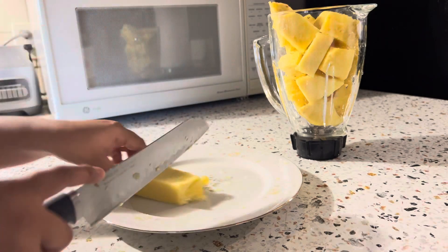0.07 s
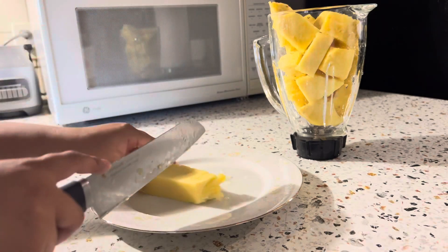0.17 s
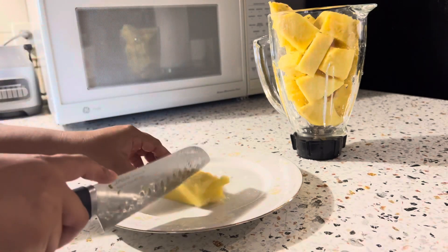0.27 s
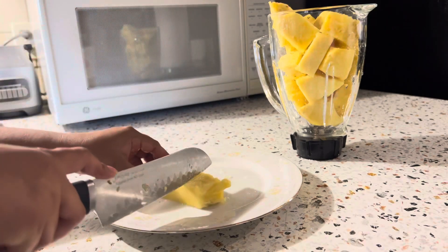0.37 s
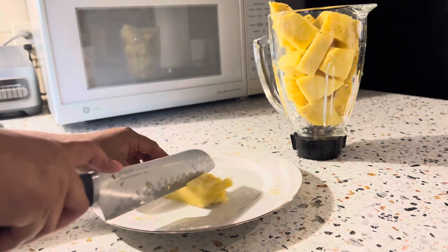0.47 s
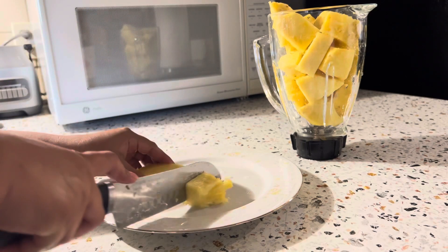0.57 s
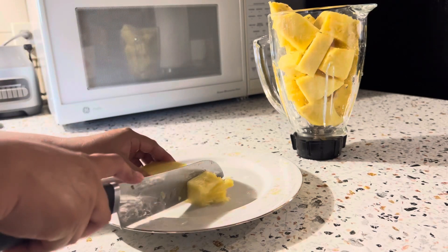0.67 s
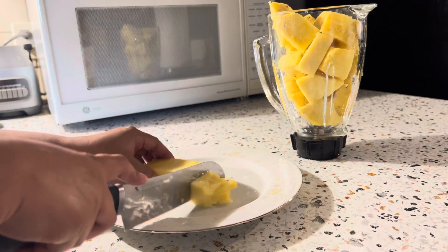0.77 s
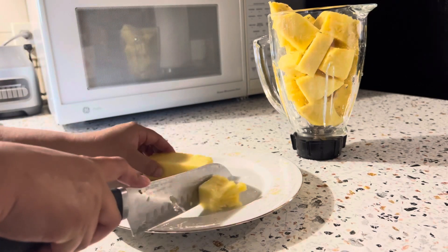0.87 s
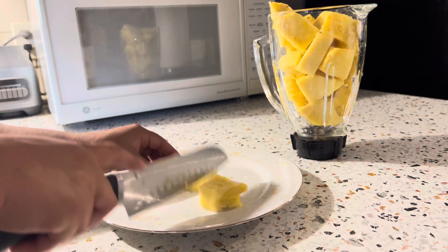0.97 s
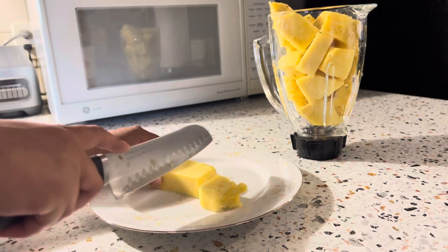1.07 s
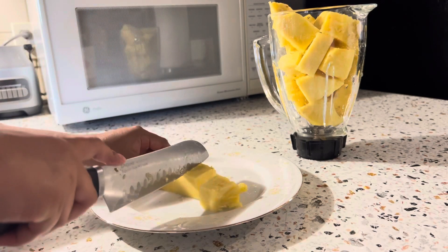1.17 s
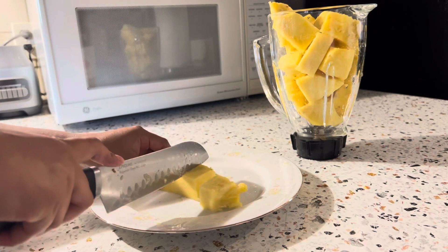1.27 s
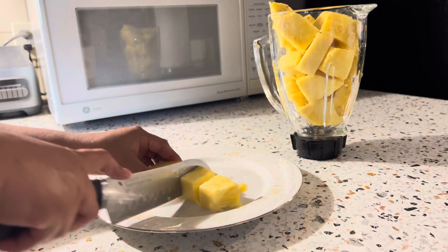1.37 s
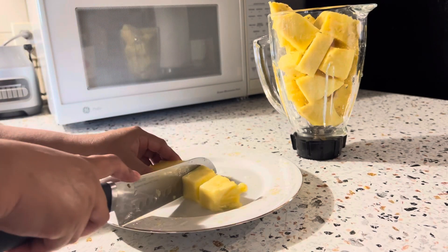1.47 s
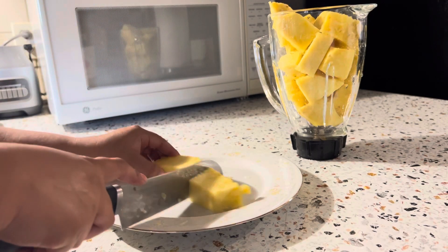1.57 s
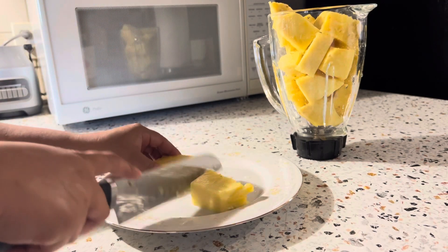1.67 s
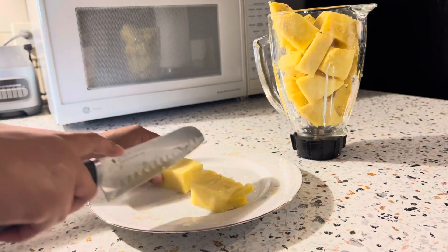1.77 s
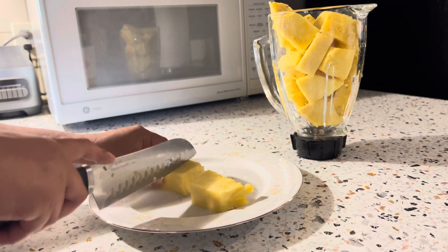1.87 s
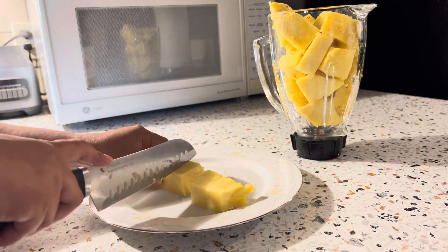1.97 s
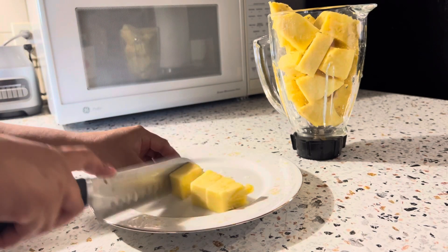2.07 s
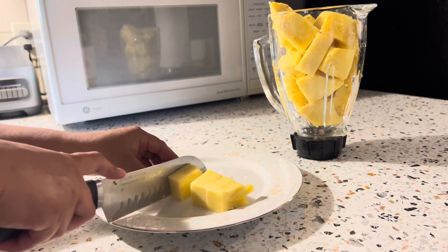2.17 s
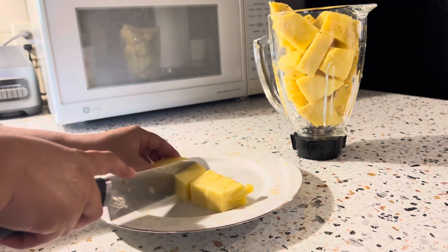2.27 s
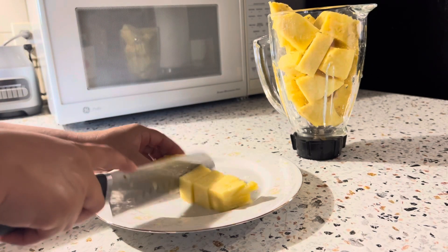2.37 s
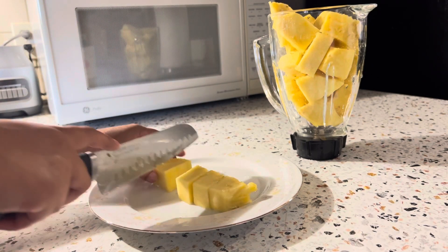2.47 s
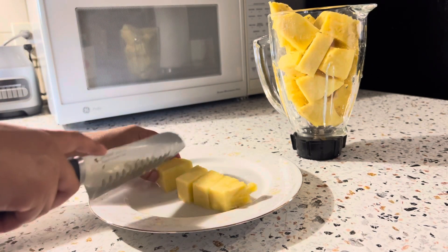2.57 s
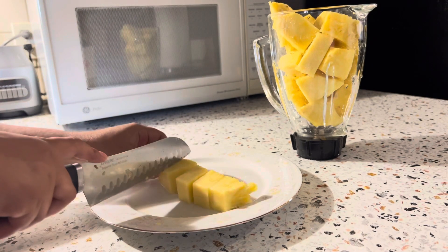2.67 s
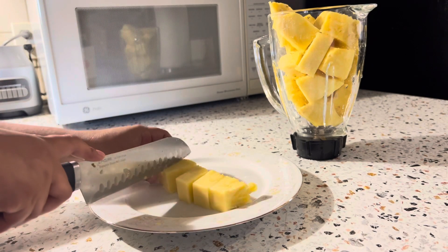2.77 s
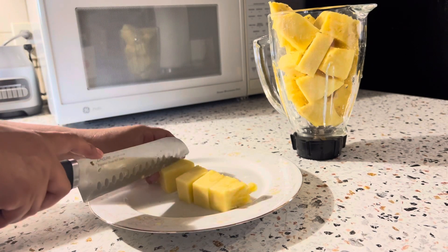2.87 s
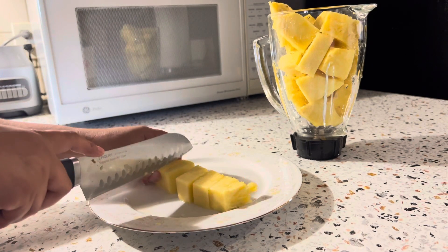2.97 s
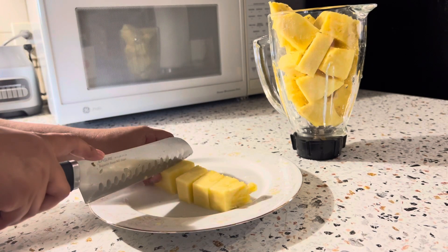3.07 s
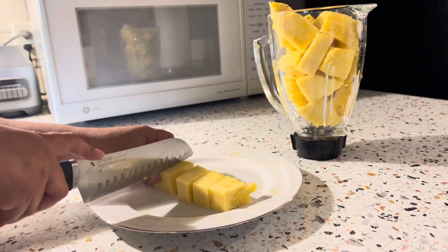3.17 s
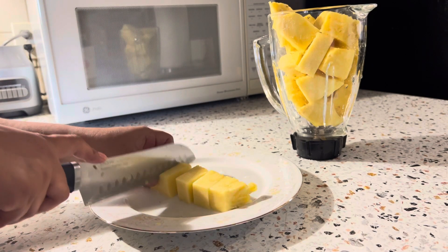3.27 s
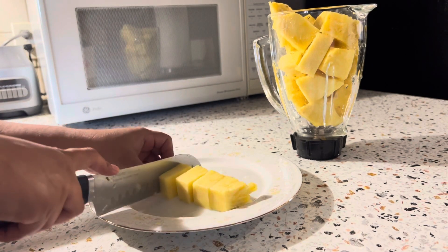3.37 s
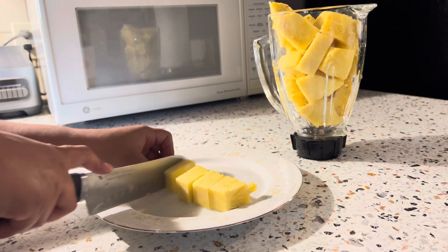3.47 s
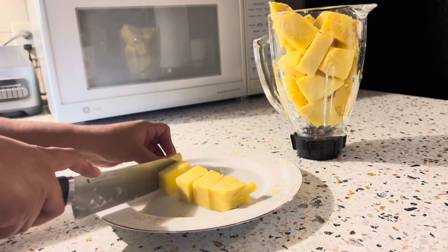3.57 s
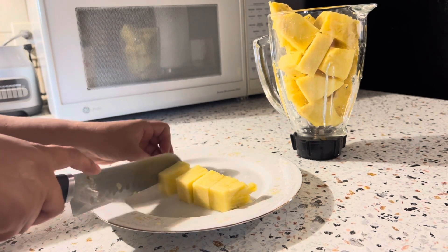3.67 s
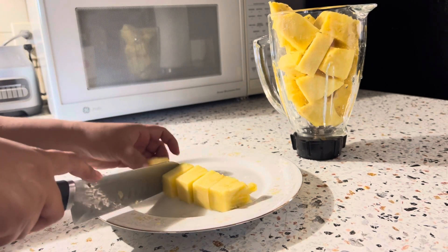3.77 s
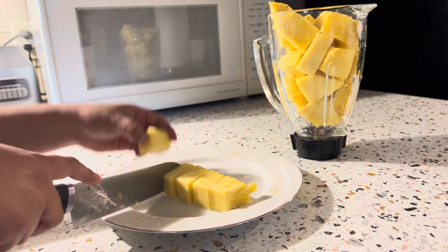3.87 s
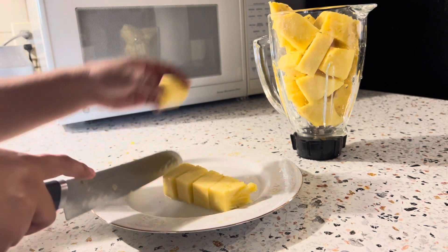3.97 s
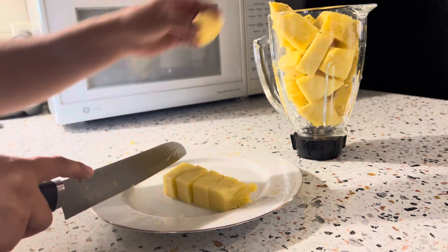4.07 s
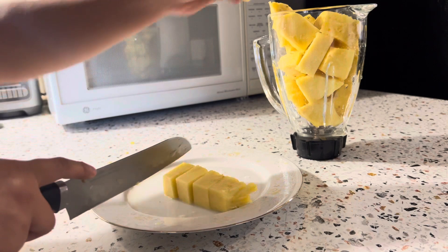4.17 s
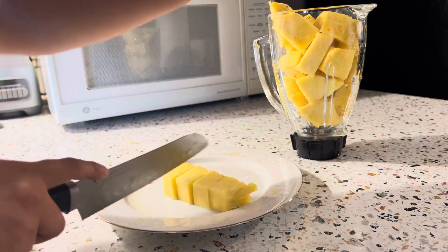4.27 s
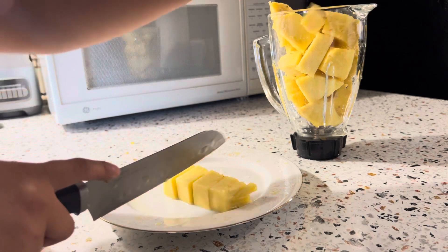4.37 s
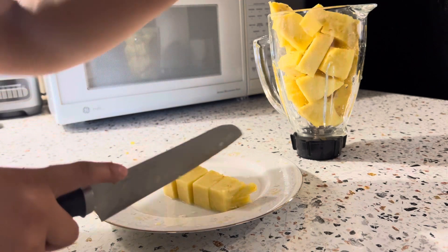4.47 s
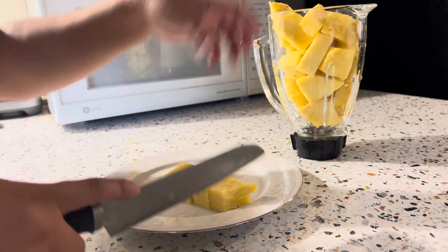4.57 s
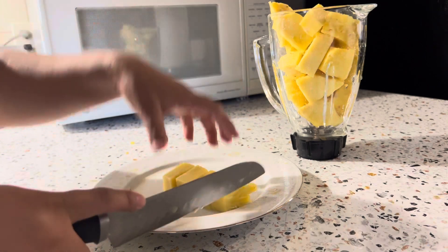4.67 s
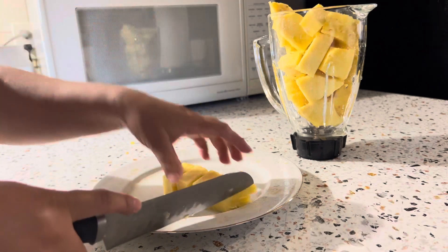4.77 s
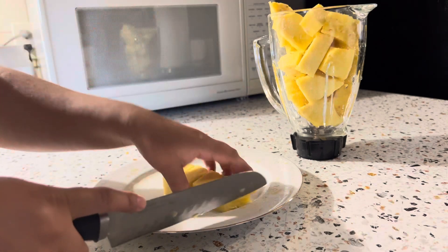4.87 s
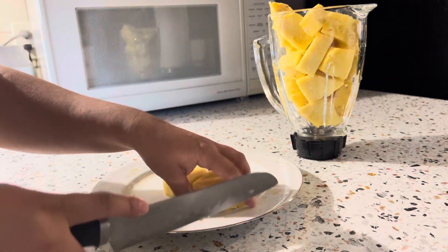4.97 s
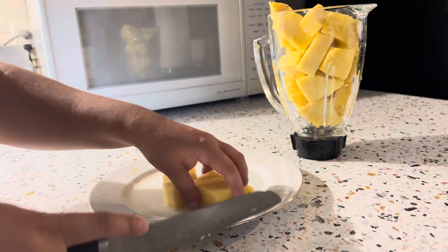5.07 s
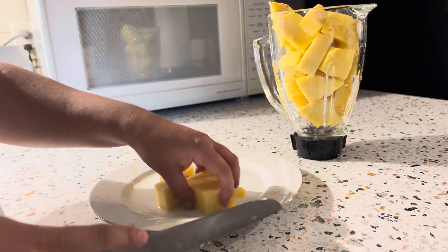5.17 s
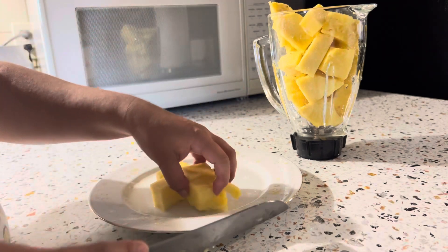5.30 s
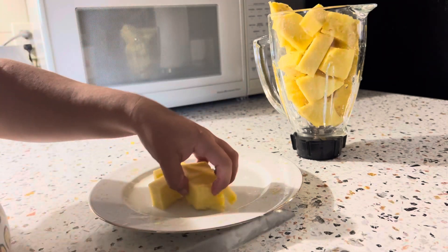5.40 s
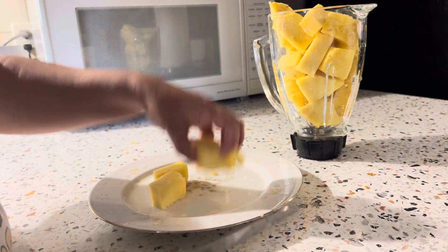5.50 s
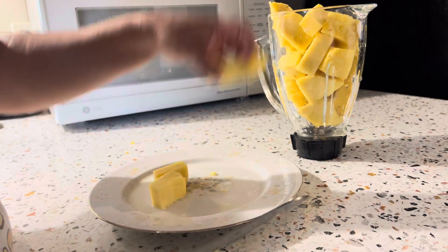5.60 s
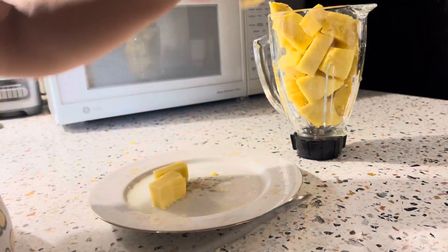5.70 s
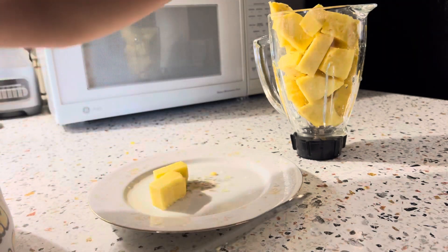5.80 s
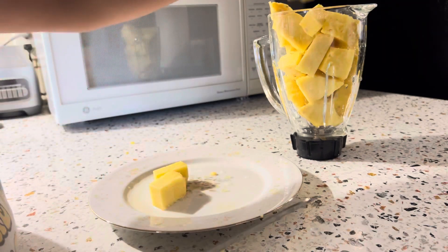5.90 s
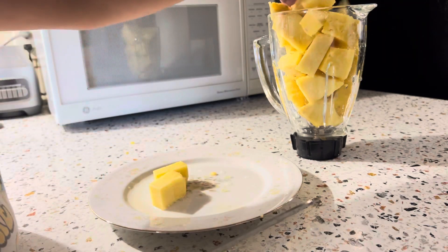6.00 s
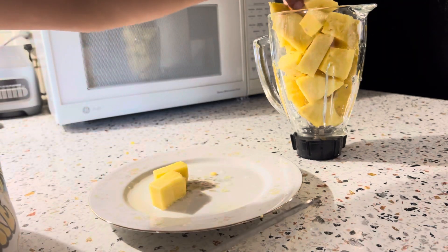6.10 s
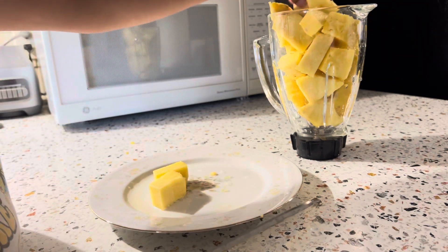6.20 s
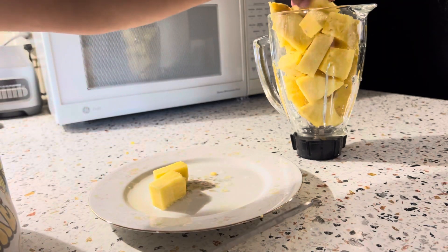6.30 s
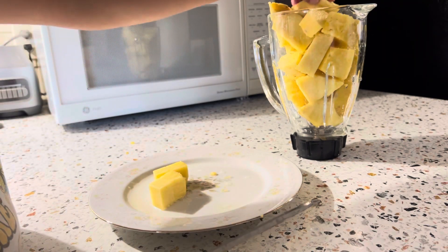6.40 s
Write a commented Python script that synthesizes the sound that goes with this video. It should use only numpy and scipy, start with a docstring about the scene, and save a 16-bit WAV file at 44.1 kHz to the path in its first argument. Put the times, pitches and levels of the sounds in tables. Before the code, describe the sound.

In a small kitchen with a low steady hum, a dull wet thump comes first, then a heavy knife cuts pineapple on a ceramic plate. Each cut crunches briefly and ends in a loud bright clack with a short ring, followed by faint scrapes and wet slaps. After a pause the knife is set down with a clink, and cubes plop softly into a jug. Close stereo microphone, plate slightly left.

```python
"""Over a steady hum, the listener first hears a dull, wet thump, as soft pineapple is touched in a small kitchen.
A chef's knife then cuts it into cubes on a ceramic plate on a stone counter. Tearing fibres are trains of
random snaps, landings are short contacts that excite damped modes, and stick-slip friction scrapes the glaze.
The knife is laid down, ringing, and wet cubes are put into a jug. Filtered noise and sines make the background."""
import sys
import numpy as np
from scipy import signal
from scipy.fft import rfft, irfft, next_fast_len
from scipy.io import wavfile
from scipy.ndimage import uniform_filter1d, map_coordinates

SR = 44100
rng = np.random.default_rng(int(sys.argv[2]) if len(sys.argv) > 2 else 0)


def wav_record(signal):
    """Record a signal, one row per channel, as 16-bit PCM in the file named by sys.argv[1]."""
    frames = np.transpose(np.atleast_2d(signal))
    bounded = np.clip(frames, -1, 1)
    # unit amplitude maps onto the largest positive 16-bit level
    quanta = np.round(bounded * 32767).astype(np.int16)
    wavfile.write(sys.argv[1], SR, quanta)


N = 284004  # length of the scene in samples
T = np.arange(int(.7 * SR)) / SR  # time axis of one event, s


def amp(db):
    """Level law: decibels to amplitude gain."""
    return 10 ** (np.asarray(db) / 20)


def unit(x):
    """Power normalisation: scale to rms 1."""
    return x / np.sqrt(np.mean(x ** 2) + 1e-20)


def along(points, hz):
    """Logarithmic frequency scale: interpolate (f/Hz, value) points at the given frequencies."""
    f, value = np.transpose(points)
    return np.interp(np.log(hz + 1), np.log(f + 1), value)


def add(track, s, x):
    """Superposition: mix x into the track from time s."""
    part = track[..., round(s * SR):][..., :x.shape[-1]]
    part += x[..., :part.shape[-1]]


def coloured(x, points, tilt_db=0):
    """Minimum-phase filtering: a causal response of unit power with the given colour, tilted in dB per octave."""
    m = 2 * next_fast_len(x.shape[-1])
    hz = np.fft.rfftfreq(m, 1 / SR)
    octaves = np.log2(np.maximum(hz, 1000) / 2000)  # the tilt is constant below 1 kHz
    gain = unit(amp(along(points, hz) + tilt_db * octaves))
    # folding the cepstrum onto positive times makes the filter causal
    cepstrum = irfft(np.log(gain + 1e-6))
    cepstrum[1:m // 2] *= 2
    cepstrum[m // 2 + 1:] = 0
    response = np.exp(rfft(cepstrum))
    return irfft(rfft(x, m) * response)[..., :x.shape[-1]]


def contact(colour, tilt_db, life):
    """Impulsive excitation: a hard contact chatters for a few milliseconds, with unit energy."""
    u = T / life
    chatter = rng.choice([-1, 1], len(T)) * u * np.exp(-u)
    burst = coloured(chatter, colour, tilt_db)
    return burst / np.linalg.norm(burst)


def ring(modes, blur, scatter_db=2.13, beat_hz=14, beat_depth=0.6):
    """Modal superposition: damped modes vary per blow; close pairs beat and shifting contact blurs pitch."""
    hz, db, t60 = np.transpose(modes)[:, :, None]
    sign = rng.choice([-1, 1], hz.shape)
    strength = sign * amp(db + scatter_db * rng.standard_normal(hz.shape))
    waver = unit(uniform_filter1d(rng.standard_normal((len(modes), len(T))), size=200, axis=1))
    phase = 2 * np.pi * hz * np.cumsum(1 + blur * waver, axis=1) / SR
    split = 2 * np.pi * beat_hz * rng.standard_normal(hz.shape) * T
    pair = np.sin(phase) + beat_depth * np.sin(phase + split)
    return np.sum(strength * amp(-60 * T / t60) * pair, axis=0)


# plate and counter rocking as one heavy body: (f/Hz, relative level/dB, t60/s)
COUNTER_MODES = [(74, -9, 0.21), (143.7, 1.5, 0.11), (175, -1.5, 0.079), (230, -3, 0.067),
                 (311.8, -3, 0.061), (387.5, -2, 0.071), (452, -8, 0.072), (501, -9.5, 0.079)]


def thud(contact_s):
    """Forced vibration: a push rocks plate and counter; a longer push favours the lowest modes. Peak 1."""
    force = np.sin(np.pi * np.minimum(T / contact_s, 1))
    rocking = np.zeros(len(T))
    for k, (hz, db, t60) in enumerate(COUNTER_MODES):
        mode = np.sin(2 * np.pi * hz * rng.normal(1, 0.017) * T)
        rocking += (-1) ** k * amp(db - 60 * T / t60) * mode
    body = signal.fftconvolve(force, rocking)[:len(T)]
    return body / np.abs(body).max()


def grains(rate, spread_db):
    """Shot noise: tiny snaps at random times (rate per second) and of random sizes, rms 1."""
    happens = rng.random(len(T)) < rate / SR
    sign = rng.choice([-1, 1], len(T))
    size = amp(spread_db * rng.standard_normal(len(T)))
    return unit(happens * sign * size)


def stroke(peak, end, depth_db, judder_db=2.0):
    """Amplitude modulation: pressure builds to a peak and lets go, catching unevenly on the way."""
    catches = np.interp(T, np.linspace(0, T[-1], 90), rng.standard_normal(90))
    pressure_db = np.interp(T, [0, peak, end], [-depth_db, 0, -depth_db])
    return amp(pressure_db + judder_db * catches) * (T < end)


# edge meets plate: (t/s, snap level/dB, treble tilt/dB per octave)
LANDINGS = [(0.5384, -3, -1.5), (0.761, -8, -1.5), (1.3748, -2.5, -1.5), (2.0914, -3, 0),
            (3.3451, -7, -0.1), (3.754, -6.5, -4)]
# colour of the sharp first snap: (f/Hz, relative spectral level/dB)
SNAP_COLOUR = [(500, -23), (2000, -4.5), (5000, 1.5), (9000, 2), (10500, -9), (12000, 0.5), (13700, -7.5),
               (15500, 2.5)]
# colour of blows on the plate: (f/Hz, relative spectral level/dB)
CLACK_COLOUR = [(100, -30), (300, -8), (600, -25), (800, -16), (1000, -11.5), (1350, -7.5), (1750, 0.5),
                (2200, -10), (2800, -5.5), (3550, -13), (4050, -1.5), (4650, -17), (5200, -5.5),
                (6000, -18), (9300, -11), (10300, -28.5), (12000, -6), (13800, -26.5), (16000, -26)]
# ringing of the plate under the edge: (f/Hz, relative level/dB, t60/s)
PLATE_MODES = [(844, -17, .16), (1097, -8, 0.18), (1345, -4, 0.2), (1495, -9.5, 0.55), (1590, -1.5, 0.19),
               (1660, -1, 0.15), (1822, 2.5, 0.12), (1935, -1, 0.19), (2340, -7.5, 0.2), (2700, -8.5, 0.22),
               (2786, -11, 0.2), (3160, -10.5, 0.14), (3894, -5, 0.13), (3930, -2, 0.29), (4035, -8, .32),
               (4237, -2.5, 0.18), (5216, -2, 0.23), (5125, -5.5, 0.3), (5400, -16, 0.22),
               (6309, -13.5, .2), (6810, -16.5, 0.24), (7170, -7.5, 0.24), (9405, -7.5, 0.29),
               (11400, -10.5, 0.27), (12500, -14, .18)]
CLACK_DB = 12.5  # the clack over the first snap
PLATE_RING_DB, CHOP_THUD_DB = -32, -22.5  # alike for every landing


def chops():
    """Impact: the edge breaks through and lands with a snap, a clack, the plate's ring and a counter thud."""
    out = np.zeros((2, N))
    for s, db, tilt_db in LANDINGS:
        snap = amp(db) * contact(SNAP_COLOUR, tilt_db, life=0.00078)
        clack = amp(db + CLACK_DB) * contact(CLACK_COLOUR, tilt_db, life=0.00087)
        plate = amp(PLATE_RING_DB) * ring(PLATE_MODES, blur=0.0039)
        add(out, s, kitchen(snap, wet_db=-10.5))
        add(out, s, kitchen(clack, wet_db=-0.5))
        add(out, s, kitchen(plate, wet_db=-8))
        add(out, s, kitchen(amp(CHOP_THUD_DB) * thud(0.00068), wet_db=-5.5))
    return out


# one cut, which lands with the next chop:
# (bite t/s, fibres level/dB, lean level/dB, blade drawn out t/s, draw scrape level/dB)
CUTS = [(.504, -39, -18, .70, -50), (1.318, -37.5, -22, 1.595, -31.5), (2.049, -40.5, -31.5, 2.3, -28.5),
        (3.282, -43.5, -23, 3.495, -38)]
BITE_DB, BITE_LAG_S = -29, .004  # thump as the edge enters the fruit, and its delay
LEAN_LEAD_S = .024  # the weight comes on this long before the landing
DRAG_DB, DRAG_PEAK_S, DRAG_END_S = -50, 0.17, 0.29  # the edge slides on the glaze after landing
DRAW_RISE_S, DRAW_FALL_S = .042, 0.023  # the quick pull that frees the blade


def cuts():
    """Sequential excitation: every cut bites, leans, tears to the plate, slides on the glaze and draws out."""
    out = np.zeros((2, N))
    for bite, fibres_db, lean_db, drawn, scrape_db in CUTS:
        landing = min(s for s, *_ in LANDINGS if s > bite)
        slide = scrape(DRAG_PEAK_S, DRAG_END_S, DRAG_DB, tilt_db=-4.5, ring_db=2.5)
        draw = scrape(DRAW_RISE_S, DRAW_RISE_S + DRAW_FALL_S, scrape_db, tilt_db=0.8, ring_db=-16)
        add(out, bite - GRAZE_S, graze())
        add(out, bite + BITE_LAG_S, push(BITE_DB, contact_s=.0035))
        add(out, bite, tearing(landing - bite, fibres_db))
        add(out, landing - LEAN_LEAD_S, push(lean_db, contact_s=.005))
        add(out, landing, slide)
        add(out, drawn - DRAW_RISE_S, draw)
    return out


# colour of the snapping fibres: (f/Hz, relative spectral level/dB)
FIBRE_COLOUR = [(200, -16), (700, -9), (1600, 4), (3000, -4), (5000, -7), (9000, -6.5), (10300, -21.5),
                (12000, -7), (16000, -18.5)]
# colour of the low crunch through the flesh: (f/Hz, relative spectral level/dB)
CRUNCH_COLOUR = [(30, -39), (100, -5), (200, 3), (400, -6.5), (700, -22), (2000, -41.5), (8000, -79)]
TEAR_LEAD_S = 0.022  # the tearing peaks this long before the landing
TEAR_RELEASE_S, FLESH_RELEASE_S = .16, 0.1  # snaps and low crunch die away after the landing
FLESH_DB = -35  # level of the crunch


def tearing(travel_s, db):
    """Fracture noise: fibres snap ever harder as the blade sinks; flesh passes a low crunch to the plate."""
    peak = max(travel_s - TEAR_LEAD_S, 1 / SR)
    snaps = amp(db) * coloured(grains(rate=1200, spread_db=1.5), FIBRE_COLOUR)
    snaps = snaps * stroke(peak, travel_s + TEAR_RELEASE_S, depth_db=15.5)
    flesh = amp(FLESH_DB) * coloured(grains(rate=900, spread_db=0.5), CRUNCH_COLOUR)
    flesh = flesh * stroke(peak, travel_s + FLESH_RELEASE_S, depth_db=13)
    return kitchen(snaps + flesh, wet_db=-3.0)


# colour of steel hissing on glaze: (f/Hz, relative spectral level/dB)
GLAZE_COLOUR = [(150, -23.5), (450, -10.5), (650, -18), (1050, -4.5), (1350, -8), (1650, 1.5), (1830, -1.5),
                (2200, -8.5), (4100, -11), (6000, -16.5), (9200, -14), (10300, -18), (11700, -3),
                (13800, -17), (15500, -19)]
# the wet blade chatters as it drags: (f/Hz, relative level/dB, t60/s)
CHATTER_MODES = [(1610, 2.5, .018), (1790, -0.5, 0.016), (11800, -4.5, .004)]
# chatter gain at the reference scrape level; dB more per dB of scrape
CHATTER_DB, CHATTER_ABOVE_DB, CHATTER_GROWTH = 0, -30, 0.99


def scrape(peak, end, db, tilt_db, ring_db):
    """Stick-slip friction: slips hiss, sustain the plate's modes and make the blade chatter when pulled hard."""
    slips = grains(rate=2200, spread_db=5) * stroke(peak, end, depth_db=22)
    plate = ring(PLATE_MODES, blur=0.0038)
    blade = ring(CHATTER_MODES, blur=0.0088)
    chatter_db = CHATTER_DB + CHATTER_GROWTH * (db - CHATTER_ABOVE_DB)
    modes = amp(ring_db) * plate / np.linalg.norm(plate)
    modes = modes + amp(chatter_db) * blade / np.linalg.norm(blade)
    singing = signal.fftconvolve(slips, modes)[:len(T)]
    hiss = amp(-2.5) * coloured(slips, GLAZE_COLOUR, tilt_db)
    return kitchen(amp(db) * (hiss + singing), wet_db=-4.5)


# colour of snapping juice: (f/Hz, relative spectral level/dB)
JUICE_COLOUR = [(200, -43), (1000, 4.5), (2000, 0), (5000, -3), (9000, 1.5), (10300, -20.5), (12000, 5.5),
                (16000, -7.5)]
GRAZE_S = .03  # the edge skims the wet surface this long before it bites
BITE_JUICE_DB = -52


def graze():
    """Film rupture: juice crackles ever louder under the edge until it bites."""
    crackle = coloured(grains(rate=600, spread_db=6), JUICE_COLOUR, tilt_db=-3.0)
    pressure = stroke(GRAZE_S, 2 * GRAZE_S, depth_db=22.5)
    return kitchen(amp(BITE_JUICE_DB) * crackle * pressure, wet_db=-3.0)


def squish(db):
    """Film rupture: a film of juice snaps, then fizzes as decaying shot noise."""
    snap = amp(db + 10.0) * contact(JUICE_COLOUR, tilt_db=-2.0, life=0.00022)
    fizz = amp(db - 17.5 - 60 * T / 0.19) * coloured(grains(rate=990, spread_db=2.0), JUICE_COLOUR)
    return kitchen(snap + fizz, wet_db=-3.0)


def push(db, contact_s):
    """Force transmission: a dull thump passes through the soft fruit."""
    return kitchen(amp(db) * thud(contact_s), wet_db=-11.5)


# the free blade touches something hard:
# (t/s, relative contact level/dB, relative thud level/dB, treble tilt/dB per octave, relative ring level/dB)
CLINKS = [(.856, -34.5, -34, -4.5, -26), (4.9906, -35.5, -33.5, -0.5, -31.5), (5.0931, -3, -21.5, -1, -7)]
# colour of the blade's contact: (f/Hz, relative spectral level/dB)
CLANG_COLOUR = [(100, -21.5), (350, -2.5), (600, -20), (760, 1), (1000, -3), (1600, 2), (1800, -1.5),
                (2100, -5), (3200, -5), (3700, -10), (4300, -15), (6000, -19.5), (9000, -26),
                (12000, -12.5), (16000, -35.5)]
# ringing of the loose blade on the plate's rim: (f/Hz, relative level/dB, t60/s)
BLADE_MODES = [(750, -8, 0.13), (1493, -15, 0.68), (1572, -3.5, .11), (2341, 4, 0.17), (2678, -17, .12),
               (3257, -13, .18), (3900, -21.5, .2), (4233, -8, 0.15), (5200, -15.5, .25), (6240, -19, 0.32),
               (7330, -21, 0.2), (7780, -20, 0.2), (8570, -23, 0.26), (9260, -24, .16), (9900, -21, 0.13),
               (11220, -21, .16), (12700, -23, 0.15)]


def clinks():
    """Free vibration: out of the fruit, the blade rings on when it touches the rim or the counter."""
    out = np.zeros((2, N))
    for s, db, thud_db, tilt_db, ring_db in CLINKS:
        clang = amp(db + 11.5) * contact(CLANG_COLOUR, tilt_db, life=0.00088)
        blade = amp(ring_db - 14.5) * ring(BLADE_MODES, blur=0.0013)
        add(out, s, kitchen(clang, wet_db=-5.0))
        add(out, s, kitchen(blade, wet_db=-6.5))
        add(out, s, kitchen(amp(thud_db + 4.5) * thud(0.00063), wet_db=-5.5))
    return out


# blade or fingers come down on the fruit: (t/s, thump level/dB, contact time/s, relative juice level/dB)
TOUCHES = [(0.2896, -23, 0.0032, -50.5), (.439, -29.5, 0.0072, -41.5), (1.159, -25, .0077, -49),
           (1.8851, -26, .009, -48), (2.615, -29, .0096, -60), (3.014, -28.5, .0078, -73),
           (3.606, -33, 0.0033, -51.5), (3.708, -32, .0043, -53), (4.944, -30.5, 0.0052, -66.5)]
TICK_DB = 14.5  # the plate's answer to a wet touch, over the juice setting
THUMP_LAG_S = .007  # the juice snaps first, then the flesh takes the load
REBOUND_S, REBOUND_DB = 0.043, -13.5  # the fruit settles once more; level re thump


def touches():
    """Compliant impact: blade and fingers press soft fruit with a wet tick, a dull thump and a weak rebound."""
    out = np.zeros((2, N))
    for s, db, contact_s, juice_db in TOUCHES:
        tick = amp(juice_db + TICK_DB) * contact(CLACK_COLOUR, tilt_db=-4.5, life=0.0027)
        add(out, s, squish(juice_db))
        add(out, s, kitchen(tick, wet_db=-2.0))
        add(out, s + THUMP_LAG_S, push(db, contact_s))
        add(out, s + THUMP_LAG_S + REBOUND_S, push(db + REBOUND_DB, contact_s=.0072))
    return out


# a loose cube tips against the plate: (t/s, thud level/dB, wet slap level/dB)
FLOPS = [(.88, -29, -14.5), (1.448, -22.5, -6), (2.127, -19, -14), (4.872, -31.5, -29),
         (5.379, -32.5, -43.5)]


def flops():
    """Impact of a flat face: a cube's wet side slaps the plate."""
    out = np.zeros((2, N))
    for s, db, slap_db in FLOPS:
        slap = amp(slap_db) * contact(CLACK_COLOUR, tilt_db=-2.5, life=0.0018)
        add(out, s, push(db, contact_s=0.00082))
        add(out, s, kitchen(slap, wet_db=-1.5))
    return out


# cubes land and shift in the jug: (t/s, relative juice level/dB)
JUG_CUBES = [(4.368, -52), (5.9588, -48), (6.100, -53), (6.169, -39.5), (6.212, -44), (6.2849, -46),
             (6.3547, -49)]
JUG_THUMP_DB, JUG_CONTACT_S = -40.5, 0.0109


def jug():
    """Damped impact: wet cubes stick to the heap in the jug and nudge the counter through it."""
    out = np.zeros((2, N))
    for s, db in JUG_CUBES:
        add(out, s, squish(db))
        add(out, s + THUMP_LAG_S, push(JUG_THUMP_DB, JUG_CONTACT_S))
    return out


# level difference, left over right: (f/Hz, difference/dB)
LEFT_LEVEL = [(100, 0), (200, -0.5), (400, 0), (700, 3), (1200, 2), (2400, 1.5), (4400, 5.5), (6500, 10.5),
              (9000, -2), (15000, 1)]
# phase by which the left channel leads: (f/Hz, lead/rad)
LEFT_LEAD = [(100, 0.053), (700, 0.19), (1600, 0.77), (2800, 0.25), (4400, 0.029), (6500, 1.2), (9000, 1.4),
             (15000, 0.97)]


def placed(x):
    """Interchannel level and phase differences: they vary with frequency and place the plate a little left."""
    m = next_fast_len(N + SR)
    hz = np.fft.rfftfreq(m, 1 / SR)
    side = np.array([[.5], [-.5]])  # half of each difference to either channel
    level = amp(side * along(LEFT_LEVEL, hz))
    turn = np.exp(1j * side * along(LEFT_LEAD, hz))
    return irfft(rfft(x, m) * level * turn, m)[:, :N]


def stereo_noise(alike, size):
    """Interchannel coherence: two white noises whose likeness depends on frequency."""
    likeness = np.clip(along(alike, np.fft.rfftfreq(size, 1 / SR)), -1, 1)
    turn = np.arccos(likeness) / 2
    spectra = rfft(rng.standard_normal((2, size)))
    mid, side = irfft(spectra * [np.cos(turn), np.sin(turn)], size)
    return np.array([mid + side, mid - side])


# likeness of the reverberation left and right: (f/Hz, likeness)
ROOM_ALIKE = [(100, 1), (300, 0.12), (700, 0), (1400, 0.47), (3000, 0), (6000, 0.02), (9000, 0.36),
              (14000, .5)]
# decay of the longer answer from the walls: (f/Hz, t60/s)
WALL_DECAY = [(100, 0.7), (600, 0.31), (1600, 0.36), (5000, 0.48), (9000, 0.21), (15000, 0.22)]
# strength of all reflections: (f/Hz, relative level/dB)
REFLECTION_COLOUR = [(100, 1.5), (7000, 3.5), (12000, -3), (15000, -6.5)]


def kitchen(x, wet_db, gap=0.0066, near_t60=0.18, far_db=-10):
    """Reverberation: direct sound, then a dense answer from nearby appliances and a longer one from the walls."""
    hz, t, z = signal.stft(stereo_noise(ROOM_ALIKE, len(T)), SR, nperseg=256)
    near = amp(-60 * t / near_t60)
    far = amp(far_db - 60 * t / along(WALL_DECAY, hz)[:, None])
    decay = np.hypot(near, far) * amp(along(REFLECTION_COLOUR, hz))[:, None]
    tail = signal.istft(z * decay, SR, nperseg=256)[1][:, :len(T)]
    tail = tail * np.clip((T - gap) * SR / 40, 0, 1)  # silent until the gap, then in over 40 samples
    response = amp(wet_db) * tail / np.linalg.norm(tail[0])
    response[:, 0] += 1  # direct sound
    return signal.fftconvolve(x[None], response, axes=1)


def slow_drift(t):
    """Slow random modulation: a smooth curve through six random values a second."""
    values = rng.standard_normal(int(N * 6 / SR) + 4)
    return map_coordinates(values, [t * 6])


# colour of the room air: (f/Hz, relative spectral level/dB)
AIR_COLOUR = [(15, -63.5), (25, -29), (40, -12), (64, 1), (92, -18), (141, -8.5), (270, -13.5), (317, -18),
              (363, -13), (394, -14.5), (531, -19.5), (863, -27.5), (1100, -28), (8830, -44.5),
              (10300, -64), (12000, -47), (16000, -68.5)]
# likeness of the room air left and right: (f/Hz, likeness)
AIR_ALIKE = [(60, 0.97), (200, .9), (500, 0.26), (1500, 0.23), (10000, 0.13)]
# partials of the appliance: (f/Hz, mean rms level/dB)
HUM_PARTIALS = [(59.2, -55.5), (149, -64), (226, -63), (360.7, -74)]


def background():
    """Stationary noise and tones: steady room air and the slightly unsteady hum of an appliance."""
    t = np.arange(N) / SR
    air = amp(-51.5) * unit(coloured(stereo_noise(AIR_ALIKE, N), AIR_COLOUR))
    hum = np.zeros(N)
    for hz, db in HUM_PARTIALS:
        level = np.sqrt(2) * amp(db + 2 * slow_drift(t))  # rms to peak
        hum += level * np.sin(2 * np.pi * hz * t + .5 * slow_drift(t))
    return air + hum


def scene():
    """Linear superposition: everything on the plate, the jug, and the room's background."""
    on_plate = chops() + cuts() + clinks() + touches() + flops()
    return placed(on_plate) + jug() + background()


TOP_HZ = 16200  # middle of the upper band edge


def record(dry):
    """Saturation and band limiting: the highest peaks are rounded off, and the top of the band is removed."""
    held = dry / (1 + np.abs(dry / .95) ** 6) ** (1 / 6)
    m = next_fast_len(N + SR)
    passed = np.clip((TOP_HZ - np.fft.rfftfreq(m, 1 / SR)) / 800 + .5, 0, 1)  # slope 800 Hz wide
    return irfft(rfft(held, m) * passed, m)[:, :N]


dry = scene()
out = record(dry)
wav_record(out)
```